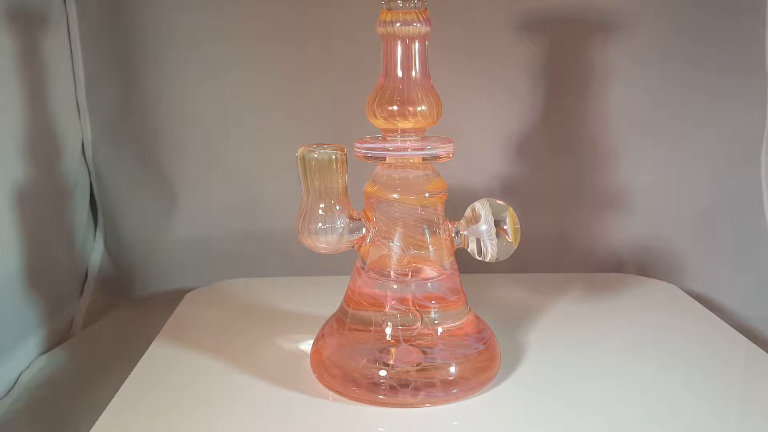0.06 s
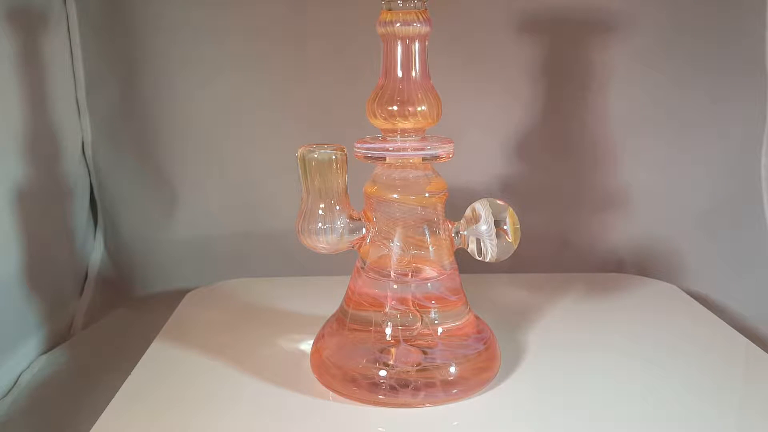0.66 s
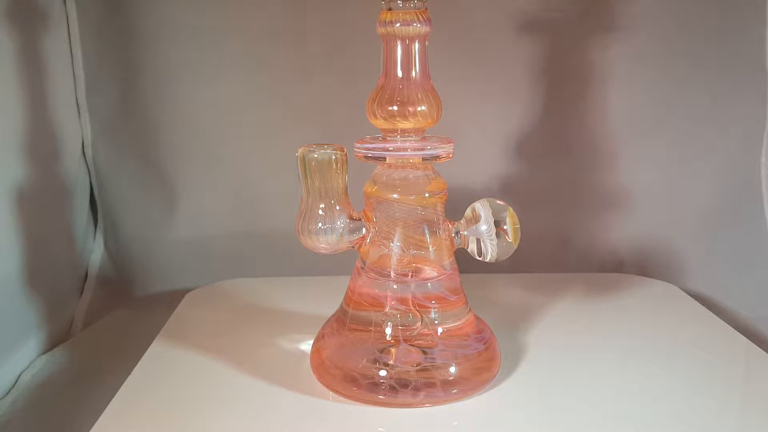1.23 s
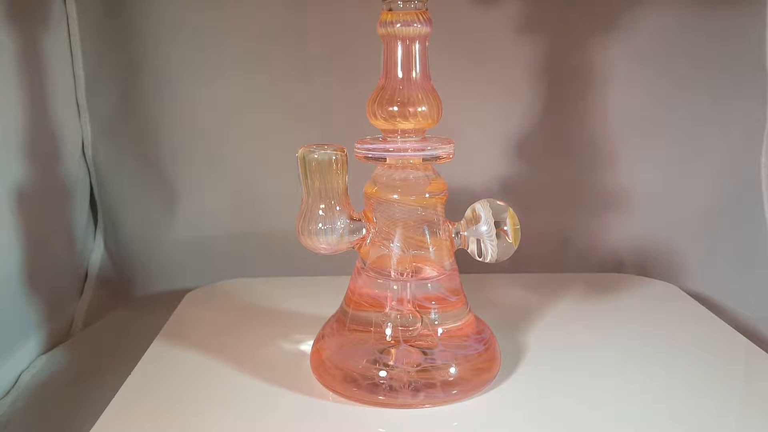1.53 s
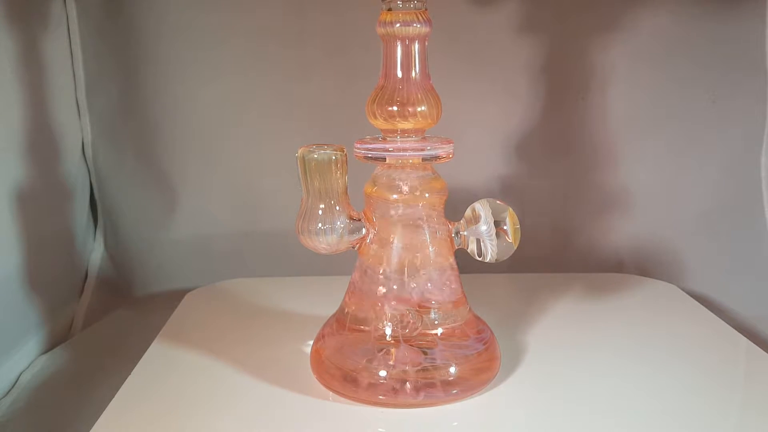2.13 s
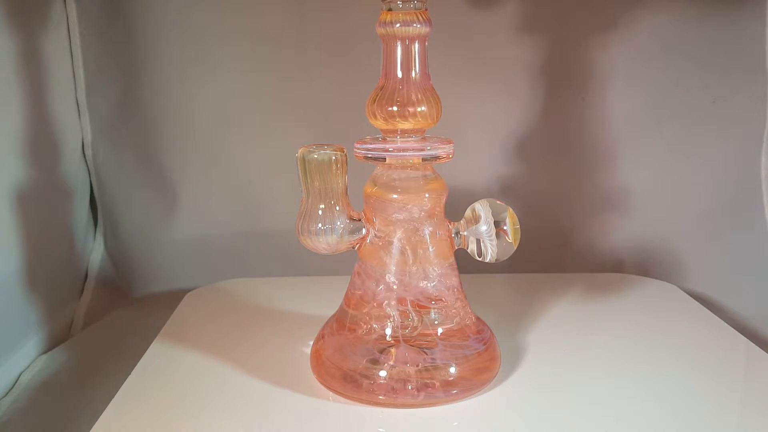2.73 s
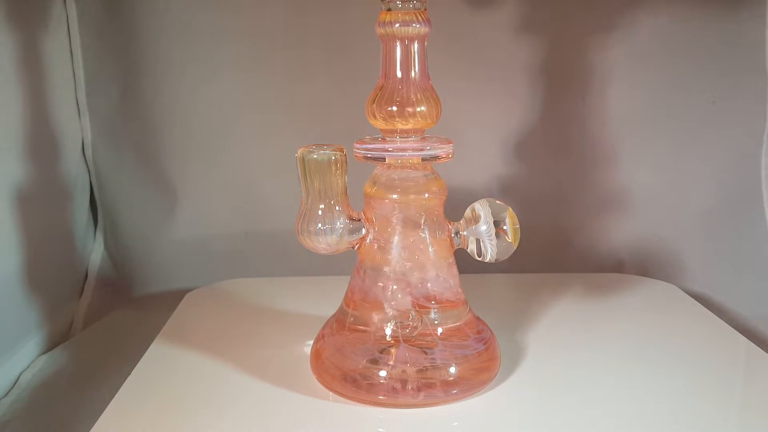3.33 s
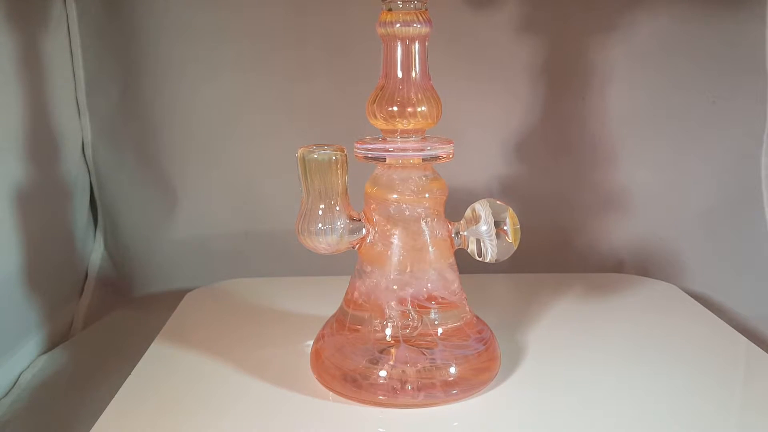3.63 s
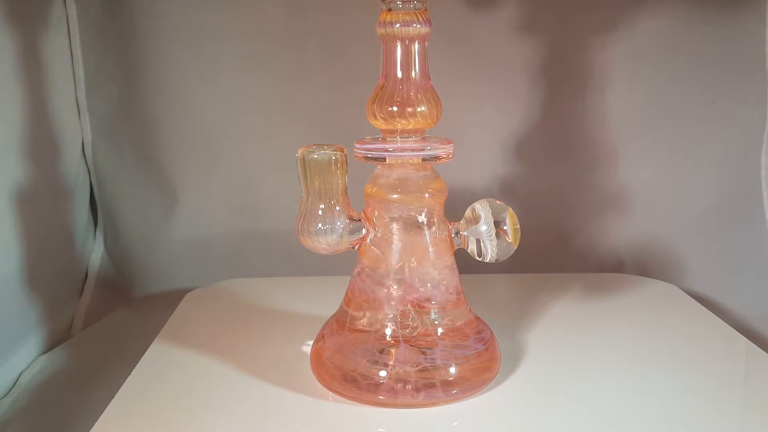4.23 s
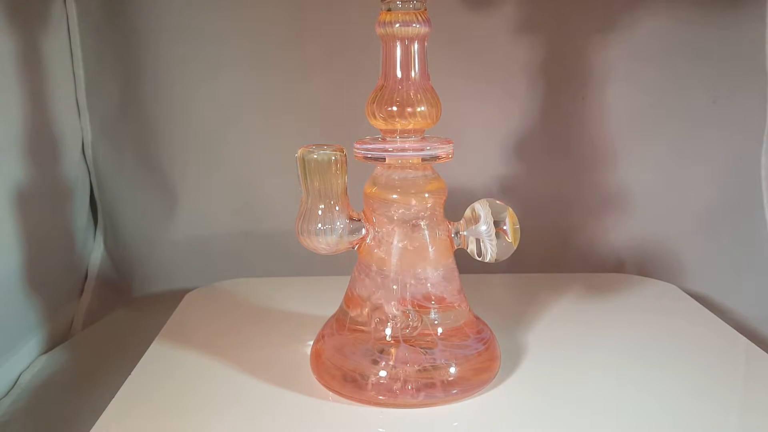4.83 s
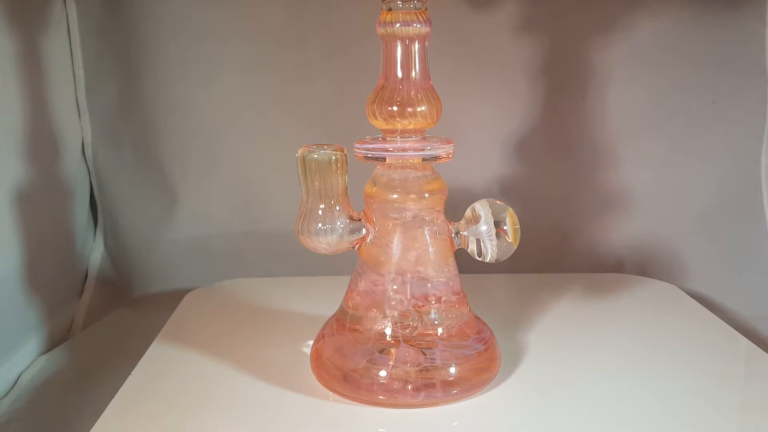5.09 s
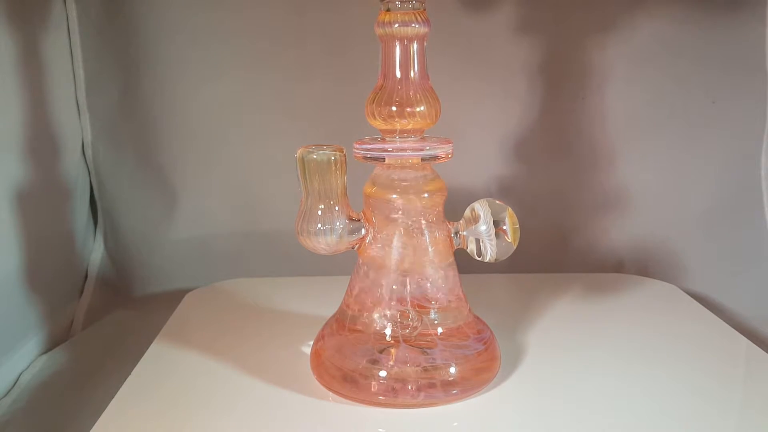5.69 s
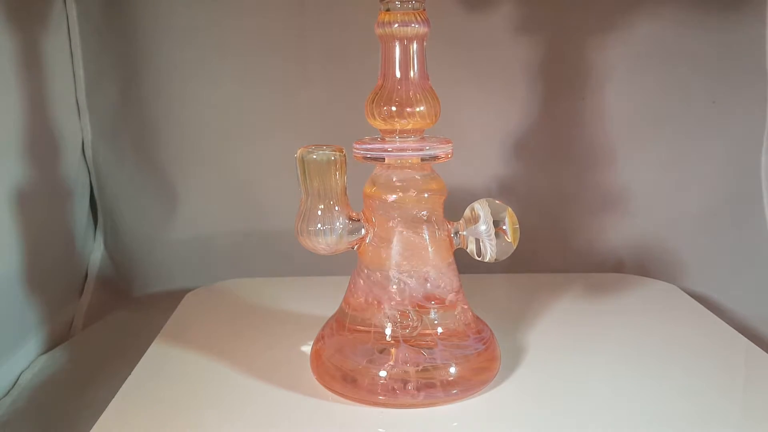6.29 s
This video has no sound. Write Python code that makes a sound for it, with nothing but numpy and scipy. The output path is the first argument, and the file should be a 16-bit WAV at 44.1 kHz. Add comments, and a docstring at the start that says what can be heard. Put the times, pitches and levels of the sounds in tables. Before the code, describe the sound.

Close stereo microphones pick up a glass water pipe in a quiet indoor room. At first there is only a low hum and a faint, fading hiss. Soon the water starts gurgling as air is pulled through it: a rapid, uneven run of hollow plops and low gulps, topped by bright fizzing and tiny splashes against the glass. The bubbling carries on without a pause.

```python
"""A bubbling water pipe

Air is drawn through the water of a glass pipe on a table in a quiet room. Large bubbles tear off
the stem and excite the resonances of the air column; small ones, damped oscillators of higher pitch,
chirp through the wall, and spray ticks on the glass. Two microphones stand close by; the room hums."""
import sys
import numpy as np
from scipy import signal
from scipy.fft import rfft, irfft
from scipy.io import wavfile
from scipy.ndimage import uniform_filter1d, map_coordinates

SR = 44100
rng = np.random.default_rng(int(sys.argv[2]) if len(sys.argv) > 2 else 0)


def bounce(signal):
    """Save signal as a 16-bit WAV file at the path given by the first command-line argument."""
    frames = np.transpose(np.atleast_2d(signal))
    limited = np.clip(frames, -1, 1)
    pcm = np.round(limited * 32767).astype(np.int16)
    wavfile.write(sys.argv[1], SR, pcm)


N = 280035
TIME = np.arange(N) / SR
TAPS = 8192
BINS = np.fft.rfftfreq(TAPS, 1 / SR)
START_S = 1.654  # the first air breaks through
PLOP_HZ, RING_HZ = 827, 1437  # a middling gulp and the upper ring of the air column
THUD_HZ, THUD_SWELL_S, THUD_LEAD_S = 286.5, 0.0018, 0.00084  # the thud comes just before the plop

# strength of the bubbling: (time [s], large-bubble level [dB], small-bubble level [dB])
DRAW = [(1.7, -45.5, -49), (1.8, -38.5, -48), (1.94, -41, -50), (2.6, -37, -48), (3.0, -39, -49),
        (3.29, -39, -47), (3.54, -41.5, -51), (3.8, -37.5, -50), (4.18, -41.5, -53), (4.75, -39, -48.5),
        (5.03, -40, -51), (5.55, -37.5, -49.5), (5.91, -38.5, -48.5), (6.35, -36.5, -47)]
LARGE, SMALL = 1, 2  # columns of DRAW
# loudest large bubbles: (time [s], plop pitch [Hz], pitch fall [ratio], swell [s], plop level [dB],
# ring pitch [Hz], ring level [dB], thud level [dB])
GULPS = [(1.6625, 902, 0, 0.0018, -34.5, 1530, -34.5, -44), (1.6722, 810, 0.1, 0.0012, -38, 1500, -40, -49),
         (1.6925, 840, 0, 0.001, -39.5, 1450, -51, -56),
         (1.7432, 820, 0.48, 0.0018, -39.5, 1470, -32.5, -35.5),
         (1.7771, 908, 0.055, 0.0016, -38, 1500, -39, -36), (1.805, 820, 0, 0.0012, -35, 1510, -29, -37.5),
         (1.8125, 900, 0.28, 0.0013, -33, 1520, -40, -41),
         (1.8186, 755, 0.015, 0.0017, -36.5, 1460, -27.5, -42),
         (1.8773, 845, 0.11, 0.0016, -30.5, 1557, -29, -36), (1.924, 890, 0, 0.00092, -31, 1480, -30, -32),
         (1.972, 860, 0.14, 0.0014, -35, 1480, -67, -40),
         (2.0768, 837, 0.047, 0.0022, -26.5, 1520, -31, -40), (2.13, 935, 0.0, 0.0022, -32, 1430, -36, -63),
         (2.1669, 820, 0.0, 0.0012, -29, 1497, -24, -30),
         (2.1933, 820, 0.0, 0.00046, -33.5, 1350, -43, -28.5),
         (2.26, 876, 0, 0.0013, -41.5, 1470, -41, -40.5), (2.298, 820, 0.03, 0.0013, -35, 1460, -30, -37.5),
         (2.4853, 836, 0.033, 0.0014, -36.5, 1467, -39, -45),
         (2.5435, 875, 0.0045, 0.0032, -37, 1600, -38, -32.5),
         (2.584, 896, 0.0, 0.0017, -24, 1470, -34, -37),
         (2.6582, 885, 0.21, 0.00026, -36, 1490, -55, -34.5),
         (2.7296, 950, 0.075, 0.0028, -35.5, 1490, -33.5, -44.5),
         (2.742, 810, 0.092, 0.0015, -36, 1430, -35, -41),
         (2.8022, 750, 0.37, 0.0019, -32.5, 1430, -33.5, -36.5),
         (2.8151, 820, 0, 0.00081, -31.5, 1473, -49, -49),
         (2.8279, 766, 0.24, 0.0034, -33, 1388, -28.5, -37),
         (2.8946, 935, 0.032, 0.0028, -25, 1474, -36, -33.5),
         (2.9028, 840, 0.037, 0.0012, -35.5, 1500, -56, -46),
         (2.9563, 870, 0.11, 0.0007, -33, 1470, -47, -28),
         (2.9733, 815, 0.0, 0.0015, -37, 1400, -52, -41.5), (3.0015, 836, 0, 0.0018, -35, 1490, -58, -41),
         (3.0263, 895, 0.0, 0.0011, -32.5, 1440, -28, -28),
         (3.066, 793, 0.012, 0.0016, -33.5, 1390, -41, -34),
         (3.0778, 816, 0, 0.0016, -38.5, 1470, -51, -43), (3.1276, 871, 0, 0.001, -46, 1510, -41, -41.5),
         (3.1401, 830, 0.071, 0.0019, -26, 1470, -32.5, -38.5),
         (3.1628, 940, 0.0, 0.0025, -33, 1490, -61, -35.5), (3.171, 790, 0.17, 0.0015, -26, 1420, -51, -65),
         (3.211, 820, 0, 0.0012, -37, 1620, -43, -39), (3.2225, 850, 0.054, 0.0024, -32, 1380, -42, -41),
         (3.2431, 810, 0.078, 0.0019, -34, 1450, -42, -42.5),
         (3.3368, 847, 0, 0.0018, -42, 1392, -39, -43.5), (3.3711, 803, 0.25, 0.0015, -34, 1480, -31, -37),
         (3.4474, 896, 0.023, 0.0026, -36, 1547, -36.5, -53),
         (3.4856, 804, 0.011, 0.002, -30.5, 1453, -31, -37.0), (3.542, 843, 0, 0.0013, -43, 1544, -48, -39),
         (3.568, 825, 0.14, 0.0021, -30.5, 1495, -32.5, -41),
         (3.6262, 820, 0, 0.00076, -39, 1460, -48, -39), (3.6738, 820, 0.1, 0.0015, -37.5, 1420, -42, -42),
         (3.7054, 885, 0.034, 0.0018, -36.5, 1640, -45, -44),
         (3.725, 840, 0.36, 0.0027, -37.5, 1510, -52, -43),
         (3.7448, 830, 0.14, 0.0013, -42, 1470, -35, -38.5),
         (3.7653, 850, 0, 0.00089, -37, 1450, -43, -41.5),
         (3.811, 783, 0.27, 0.0026, -35.5, 1435, -33, -42),
         (3.9045, 840, 0, 0.0022, -38, 1526, -38.5, -39.5),
         (3.9653, 890, 0.27, 0.00089, -27, 1520, -25.5, -31),
         (3.9883, 880, 0.11, 0.0024, -35.5, 1410, -34, -33.5),
         (4.0184, 790, 0, 0.0016, -38.5, 1420, -52, -41.5),
         (4.0728, 900, 0.0, 0.0007, -32.5, 1460, -29, -33.5),
         (4.0854, 920, 0.043, 0.0011, -34.5, 1470, -41, -40),
         (4.1028, 790, 0.27, 0.0014, -40.5, 1429, -46, -34),
         (4.1368, 820, 0.11, 0.001, -32.5, 1410, -37.5, -65),
         (4.1395, 960, 0.1, 0.0043, -39, 1420, -33, -33.5), (4.195, 825, 0, 0.0016, -27, 1390, -44, -46),
         (4.2609, 840, 0.042, 0.0023, -34.5, 1475, -37, -37), (4.2783, 892, 0, 0.0012, -40, 1490, -40, -40),
         (4.3214, 950, 0.084, 0.0032, -34.5, 1486, -36, -68),
         (4.348, 850, 0.0, 0.00081, -34, 1480, -39, -35), (4.3882, 830, 0.046, 0.002, -37, 1530, -42, -39),
         (4.4103, 825, 0, 0.0008, -42, 1480, -50, -38), (4.4641, 926, 0, 0.0016, -39.5, 1527, -41, -35.5),
         (4.562, 860, 0.0, 0.0015, -33.5, 1510, -49, -35), (4.6198, 860, 0.066, 0.002, -37, 1550, -40, -40),
         (4.6445, 856, 0, 0.0012, -39.5, 1524, -52, -49), (4.689, 820, 0.0014, 0.0026, -37, 1493, -29, -37),
         (4.6947, 872, 0.13, 0.0035, -30, 1500, -43.5, -53), (4.7117, 820, 0, 0.0011, -41, 1480, -53, -39),
         (4.7608, 929, 0.093, 0.0039, -36.5, 1444, -36, -39),
         (4.783, 810, 0.091, 0.0013, -35.5, 1501, -39, -39),
         (4.8077, 890, 0, 0.0013, -42, 1520, -44.5, -56), (4.8823, 863, 0.27, 0.0014, -33, 1370, -56, -37),
         (4.8851, 820, 0.21, 0.0015, -35, 1475, -37, -42),
         (4.9689, 847, 0.0, 0.0024, -30.5, 1500, -51, -37.5),
         (5.039, 895, 0.21, 0.0015, -42.5, 1550, -45, -39.5),
         (5.0849, 810, 0.0082, 0.003, -35.5, 1440, -40.5, -40),
         (5.11, 800, 0, 0.0015, -39, 1600, -41, -41.5), (5.2008, 920, 0.051, 0.0012, -50, 1420, -36, -37.5),
         (5.2451, 916, 0.0, 0.0015, -32, 1460, -38, -49), (5.286, 910, 0, 0.0014, -38, 1530, -40, -46),
         (5.3833, 834, 0.067, 0.0012, -47, 1492, -42, -39),
         (5.391, 855, 0.065, 0.0029, -55, 1540, -33, -58), (5.4086, 854, 0, 0.0014, -38.5, 1470, -49, -60),
         (5.467, 856, 0.086, 0.0033, -34.0, 1460, -49, -42),
         (5.5315, 820, 0.34, 0.00062, -36.5, 1430, -37, -33.5),
         (5.5799, 786, 0, 0.00083, -46, 1480, -43, -37.5),
         (5.6167, 864, 0.1, 0.0031, -31, 1490, -31.5, -41), (5.6434, 950, 0.0, 0.0016, -40, 1460, -47, -41),
         (5.7373, 790, 0.18, 0.0014, -38, 1510, -28, -36.5),
         (5.7888, 890, 0.58, 0.0015, -38.5, 1580, -59, -44.5),
         (5.8756, 775, 0, 0.0026, -34.5, 1480, -52, -59), (5.946, 830, 0.31, 0.0013, -35.5, 1386, -34, -42),
         (6.0094, 930, 0, 0.00125, -43, 1470, -40, -35.5),
         (6.0258, 920, 0.18, 0.00085, -32, 1520, -40, -33),
         (6.04, 825, 0.0, 0.0012, -32.5, 1440, -36, -33.5), (6.09, 985, 0.073, 0.0038, -59, 1627, -33, -48),
         (6.11, 820, 0.057, 0.0014, -37, 1450, -32, -64), (6.1192, 950, 0.0, 0.0019, -36, 1490, -38, -36.5),
         (6.1987, 935, 0.067, 0.0024, -37, 1412, -31.5, -43),
         (6.2599, 954, 0.0, 0.0016, -23.5, 1510, -32, -37), (6.2656, 895, 0, 0.00079, -37, 1520, -49, -59),
         (6.2808, 750, 0.39, 0.0014, -36.5, 1570, -65, -33.5),
         (6.3413, 786, 0.12, 0.0024, -35, 1520, -45, -45)]
# deep bubbles: (time [s], relative level [dB], pitch [Hz], swell [s])
GLUGS = [(1.9418, -33, 242, 0.0036), (2.0132, -32.5, 217, 0.003), (2.1063, -39, 256, 0.00079),
         (2.1224, -34, 303, 0.0015), (2.1614, -50, 272, 0.0012), (2.2801, -33, 261, 0.0015),
         (2.3372, -29, 320, 0.0022), (2.471, -36, 300, 0.0019), (2.48, -34, 275, 0.0016),
         (2.6434, -33, 334, 0.0014), (2.734, -28.5, 287, 0.002), (3.6245, -32.5, 266, 0.0027),
         (3.676, -32, 227, 0.0042), (3.8987, -36.5, 227, 0.0035), (4.1886, -33, 302, 0.0015),
         (4.2225, -32, 258, 0.0028), (4.351, -28.5, 263, 0.0017), (4.387, -31.5, 276, 0.0028),
         (4.667, -30.5, 248, 0.0032), (4.739, -32.5, 240, 0.0019), (4.753, -37, 264, 0.0013),
         (4.9381, -41, 274, 0.0024), (5.3284, -33, 293, 0.0018), (5.4479, -30.5, 260, 0.0023),
         (5.4708, -33.5, 320, 0.0032), (5.534, -39, 238, 0.0023), (5.6682, -53, 247, 0.0022),
         (5.6876, -35, 264, 0.0047), (5.7142, -36, 237, 0.0013), (5.7776, -30, 300, 0.0018),
         (5.868, -30.5, 280, 0.0021), (5.941, -39, 320, 0.0023), (5.9924, -32, 242, 0.0021),
         (6.1664, -33.5, 290, 0.0019), (6.24, -33, 255, 0.0024), (6.311, -29, 284, 0.0018)]
# strength of the faint large bubbles by pitch: (frequency [Hz], relative level [dB])
CHURN_SPECTRUM = [(90, 9.5), (140, 8.5), (220, 2), (360, 2), (550, 0.5), (850, -4), (1200, 0.5),
                  (1500, -4.5), (1800, -3)]
# loudest small bubbles: (time [s], relative level [dB], nominal pitch [Hz])
CHIRPS = [(1.875, -45, 5600), (1.9775, -43, 3900), (2.0793, -45.5, 3620), (2.312, -48, 4440),
          (2.527, -40.5, 4480), (2.531, -38, 3050), (2.6405, -42.5, 4920), (2.692, -43, 2950),
          (2.7406, -44, 3700), (2.95, -39.5, 2560), (3.173, -44.5, 5530), (3.1992, -40, 2700),
          (3.269, -43.5, 2460), (3.9386, -39.5, 2830), (4.52, -42, 4400), (4.685, -43.5, 6540),
          (4.727, -39, 2660), (4.833, -40, 2950), (4.952, -44, 5700), (5.5647, -40.5, 2900),
          (6.028, -38, 6330), (6.167, -43.5, 3520), (6.2808, -37.5, 6440)]
# clusters of tiny bubbles: (time [s], relative level [dB], duration [s], middle pitch [Hz])
SPLASHES = [(1.783, -46, 0.0065, 4430), (1.958, -40, 0.0029, 5420), (2.002, -48, 0.0045, 4270),
            (2.0138, -49, 0.025, 5250), (2.128, -41.5, 0.042, 4760), (2.155, -54, 0.008, 5340),
            (2.19, -43, 0.0048, 4390), (2.225, -45, 0.0056, 3790), (2.246, -41.5, 0.0071, 4800),
            (2.37, -57, 0.013, 4330), (2.414, -42, 0.011, 6190), (2.437, -44, 0.0022, 4590),
            (2.452, -49, 0.0061, 4200), (2.501, -56, 0.0093, 5490), (2.553, -38, 0.02, 4530),
            (2.667, -41.5, 0.011, 4600), (2.706, -44, 0.0082, 4900), (2.792, -39.5, 0.0079, 2620),
            (2.807, -44.5, 0.014, 4660), (2.845, -44, 0.0086, 4200), (2.8688, -47, 0.01, 5300),
            (2.8971, -40.5, 0.01, 3860), (2.993, -46, 0.014, 4000), (3.028, -50, 0.0097, 4950),
            (3.062, -40.5, 0.006, 3800), (3.095, -37, 0.019, 3100), (3.121, -42, 0.019, 5430),
            (3.154, -48, 0.0051, 4500), (3.247, -47, 0.0064, 3200), (3.285, -37, 0.009, 3840),
            (3.322, -46, 0.018, 3660), (3.364, -37.5, 0.018, 4640), (3.4266, -45, 0.006, 4440),
            (3.463, -43, 0.008, 5950), (3.4865, -37.5, 0.013, 4500), (3.5332, -50, 0.01, 2470),
            (3.5548, -41, 0.015, 3570), (3.625, -48, 0.011, 4800), (3.681, -48.5, 0.0053, 5200),
            (3.735, -41.0, 0.018, 4720), (3.772, -42, 0.017, 3820), (3.809, -36.5, 0.0051, 3390),
            (3.84, -39.5, 0.013, 3530), (3.8735, -37.5, 0.018, 4000), (3.962, -39.5, 0.007, 6030),
            (3.981, -39, 0.012, 3520), (4.045, -45, 0.009, 4770), (4.074, -43, 0.008, 3320),
            (4.089, -42, 0.008, 5830), (4.102, -45, 0.016, 3800), (4.142, -41, 0.012, 2620),
            (4.1659, -46, 0.0099, 4740), (4.235, -39.5, 0.016, 4400), (4.2737, -39.5, 0.01, 4250),
            (4.33, -46, 0.006, 4530), (4.3523, -45.5, 0.007, 3030), (4.3766, -40, 0.006, 4860),
            (4.3876, -40.0, 0.02, 3470), (4.4353, -43.0, 0.014, 3650), (4.468, -44, 0.006, 4650),
            (4.545, -40.5, 0.012, 4100), (4.592, -44, 0.011, 2900), (4.644, -48, 0.014, 5030),
            (4.732, -43, 0.0067, 5500), (4.773, -38, 0.0084, 3610), (4.927, -46.0, 0.013, 4350),
            (5.002, -38, 0.022, 3740), (5.04, -47, 0.021, 4530), (5.0693, -59, 0.012, 5630),
            (5.162, -39.5, 0.017, 4970), (5.191, -44, 0.021, 4400), (5.232, -44, 0.012, 3700),
            (5.264, -47, 0.022, 4900), (5.3, -46.0, 0.0098, 4100), (5.3209, -43, 0.02, 5000),
            (5.361, -50, 0.013, 4140), (5.385, -39, 0.014, 3770), (5.405, -51, 0.02, 5100),
            (5.462, -47.0, 0.0057, 5930), (5.468, -46.5, 0.0083, 6400), (5.502, -50, 0.011, 4000),
            (5.5974, -39, 0.017, 3450), (5.614, -42, 0.017, 4600), (5.65, -50, 0.006, 4300),
            (5.67, -37.5, 0.009, 4300), (5.74, -54, 0.016, 4770), (5.763, -54, 0.0077, 4990),
            (5.778, -56, 0.014, 5660), (5.804, -40.0, 0.016, 4360), (5.835, -48, 0.012, 3000),
            (5.9, -42, 0.0093, 3600), (5.92, -46.5, 0.015, 4000), (5.952, -45, 0.015, 4740),
            (6.066, -37, 0.022, 3200), (6.109, -40.0, 0.016, 6130), (6.136, -40.5, 0.014, 3330),
            (6.202, -39, 0.019, 4440), (6.239, -46, 0.0057, 2640), (6.258, -40, 0.01, 5670),
            (6.32, -42.0, 0.007, 4600)]
# tearing bubble skins: (time [s], relative level [dB])
SPITS = [(1.8481, -41), (2.0212, -45), (2.321, -60), (2.4772, -48), (2.5885, -47), (2.657, -42),
         (3.173, -48), (3.7504, -58), (3.963, -44), (4.6912, -56), (4.732, -46), (5.386, -44),
         (5.5022, -45), (5.6191, -46), (5.7865, -44), (6.2566, -46)]
# spectrum of a spit: (frequency [Hz], gain [dB])
SPIT_SPECTRUM = [(1000, -19), (4000, -2.5), (8800, 10), (11000, -5.5), (13000, -1), (15000, -10)]
# large drops striking the glass: (time [s], relative level [dB])
TINKS = [(2.17, -42.5), (2.658, -45), (3.029, -46.5), (4.1396, -42.5), (4.552, -48), (4.692, -41),
         (5.464, -37), (5.604, -39.5)]
# resonances of the air above the water: (frequency [Hz], bandwidth [Hz], gain [dB])
AIR_MODES = [(115.8, 42, -6), (215.2, 27.4, 4), (285, 110, -3.5), (373, 50, -10.5), (509.5, 50, -7),
             (785, 200, -0.5), (948, 58, 2), (1209, 83, -7), (1291, 60, -0.5), (1434, 142, 6.5),
             (1565, 100, 2.5), (1646, 52, -2)]
# resonances of the vessel: (frequency [Hz], bandwidth [Hz], gain [dB])
GLASS_MODES = [(2530, 190, -2), (2970, 170, 2), (3410, 130, -1.5), (3900, 84, 4.5), (4297, 140, 8),
               (4756, 256, 9.5), (5520, 420, 5), (6463, 480, 4.5), (6880, 580, -0.5), (8420, 490, -3),
               (8747, 136, 7.5), (9300, 170, -3), (15500, 640, -8)]
# broadband transmission through the wall: (frequency [Hz], gain [dB])
GLASS_LEAK = [(300, -26.0), (2000, 6.0), (3200, 1.0), (6500, -4.5), (7600, -16.5), (10500, -22.5),
              (13800, -20), (16000, -42)]
# balance of the microphones: (frequency [Hz], left minus right level [dB])
MIC_BALANCE = [(60, -3), (210, -1), (380, -3.5), (465, -18), (510, 1.5), (560, 9), (660, 17), (720, -3),
               (800, 2.5), (1050, -4), (1200, -23.5), (1350, 6.5), (1440, -13), (1540, -10.5), (1710, -3),
               (1900, 7), (2300, -2.5), (3000, 3.5), (4700, 1), (5550, -9), (6100, 5.5), (8800, -4),
               (15000, -0.5)]
# phase between the microphones at bearing 1: (frequency [Hz], lead of the left [rad])
MIC_LEAD = [(330, 0), (540, .9), (700, 0), (1050, 0), (1170, 3), (1340, 3), (1460, 1.4), (1700, 1.6),
            (2800, 2.7), (3400, 3.8), (3950, 8.2), (4250, 6.4), (4650, 8.4), (6000, 7.8), (6600, 9.8),
            (8800, 11.2), (16000, 22)]
# reverberation of the room: (frequency [Hz], time to decay by 60 dB [s])
ROOM_T60 = [(150, 1), (600, 0.19), (1500, 0.51), (5000, 0.097), (15000, 0.33)]
# room noise: (frequency [Hz], relative spectral density [dB])
NOISE_SPECTRUM = [(20, -52), (42, -9), (72, -12), (112, -1.5), (165, -10.5), (235, -10), (260, -6.5),
                  (297, -2), (325, -24), (425, -11.5), (460, -22), (840, -31), (2700, -36), (3300, -28),
                  (4200, -41.5), (5200, -43.5), (6300, -44.5), (7150, -37), (8300, -48), (10000, -47),
                  (16000, -43)]
# likeness of the room noise at the two microphones: (frequency [Hz], correlation [0-1])
NOISE_CORRELATION = [(100, .99), (400, .93), (1000, .55), (3000, .3), (12000, .1)]
# partials of the room hum: (frequency [Hz], relative level [dB])
HUM = [(59, -66), (104, -73.5), (191, -57.5), (284, -78.5), (350, -76.5), (414, -70)]
# spectrum of the opening hiss: (frequency [Hz], relative level [dB])
HISS_SPECTRUM = [(200, 3), (1000, -8), (3000, -10), (5500, -16.5), (8500, -13.5), (11000, -20),
                 (16000, -15)]


def gulps():
    """Bubble detachment: the loudest large bubbles tear off the stem one by one."""
    out = np.zeros(N)
    for (s, *row), thud_detune in zip(GULPS, rng.standard_normal(len(GULPS))):
        add(out, s - THUD_LEAD_S, gulp(row, thud_detune))
    return out


def gulp(row, thud_detune):
    """Impulsive excitation: a large bubble shoves the water, plops and rings the air column."""
    hz, fall, swell_s, plop_db, ring_hz, ring_db, thud_db = row
    out = np.zeros(TAPS // 2)
    add(out, 0, at_level(plop(THUD_HZ * np.exp(0.11 * thud_detune), THUD_SWELL_S, fall=0), thud_db))
    add(out, THUD_LEAD_S, at_level(plop(hz, swell_s, fall), plop_db))
    add(out, THUD_LEAD_S, at_level(plop(ring_hz, swell_s, fall=0.028), ring_db))
    return out


def plop(hz, swell_s, fall):
    """Cavity resonance: a round note swells and dies, sinking in pitch as the cavity grows."""
    age = np.arange(TAPS // 4) / SR / max(swell_s, 3e-4)
    pitch = hz * np.exp(-fall * np.tanh((age - 2) / 3))
    return age ** 1.5 * np.exp(-age) * np.sin(2 * np.pi * np.cumsum(pitch) / SR)


def bubble(hz, t60, glide=0.005, onset_s=0.0012):
    """Damped oscillation: a decaying sine glides as the bubble changes shape near the surface."""
    t = np.arange(TAPS // 4) / SR
    age = t / max(t60, 1e-3)
    phase = 2 * np.pi * hz * t * (1 + glide * np.minimum(age, 2))
    onset = 1 - np.exp(-(t / onset_s) ** 2)
    return np.sin(phase) * np.exp(-np.log(1000) * age) * onset


def knocks(db=-9.5, longest_s=0.0015, delay_s=0.00092):
    """Direct transmission: the briefest large bubbles collapse hard and knock through the wall."""
    out = np.zeros(N)
    for s, hz, _, swell_s, level_db, *_ in GULPS:
        if swell_s < longest_s:
            add(out, s + delay_s, at_level(bubble(hz * 1.2, t60=0.0032, onset_s=0.000066), level_db))
    return amp(db) * out


def lesser_gulps(db=-6.5, per_s=36, jitter=0.35, fall=0.11, swell_s=0.00096, count=190):
    """Quasi-periodic detachment: weaker gulps leave the stem in a loose rhythm, scaled by the flow."""
    out = np.zeros(N)
    for k, (late, plop_detune, ring_detune, thud_detune, *_) in enumerate(rng.normal(size=(count, 7))):
        hz = PLOP_HZ * np.exp(0.094 * plop_detune)
        ring_hz = RING_HZ * np.exp(0.047 * ring_detune)
        s = START_S + (k + 1 + jitter * late) / per_s
        add(out, s, gulp((hz, fall, swell_s, db, ring_hz, db, db), thud_detune))
    return flow(LARGE, rise_s=0.18) * out


def glugs(db=-1.0, crowd_db=-14.0, per_s=60, count=8):
    """Low-frequency resonance: single deep bubbles glug over a crowd of longer-ringing ones."""
    out, crowd = np.zeros(N), np.zeros(N)
    for s, level_db, hz, swell_s in GLUGS:
        add(out, s, at_level(plop(hz, swell_s, fall=0), level_db + db))
    for hz in np.linspace(195, 380, count):
        clicks = births(per_s / count, spread_db=-0.5, limit=1.2)
        crowd += excite(clicks, bubble(hz, t60=0.02, onset_s=0.0034))
    return out + amp(crowd_db) * flow(LARGE, rise_s=0.067) * evened(crowd)


def breakthrough(db=-46.0, fade_db_per_s=140, gap_s=0.014, fall=0.1, swell_s=0.0032, count=4):
    """Pitch falls with size: the first air escapes in a run of ever larger, lower, weaker plops."""
    out = np.zeros(N)
    for age, thud_detune in zip(np.arange(count) * gap_s, rng.standard_normal(count)):
        smallness = np.exp(-age / 0.014)
        hz, ring_hz = 720 + 260 * smallness, 1420 + 210 * smallness
        plop_db = db - fade_db_per_s * age
        row = (hz, fall, swell_s, plop_db, ring_hz, plop_db + 4.5, db - 1)
        add(out, START_S - THUD_LEAD_S + age, gulp(row, thud_detune))
    return out


def churn(pipe, db=-1.5, per_s=380, count=48):
    """Source and filter: surges of faint large bubbles sound through the modes of the air column."""
    out = np.zeros(N)
    for hz in np.linspace(90, 1750, count):
        grain = bubble(hz, t60=0.0074 * rng.uniform(0.25, 1.6), onset_s=0.0022)
        clicks = births(per_s / count, spread_db=0.5, limit=1.7)
        out += excite(clicks, at_level(grain, read(CHURN_SPECTRUM, hz)))
    ringing = excite(out * surge(depth_db=1.7, length_s=0.02), pipe)
    return amp(db) * flow(LARGE, rise_s=0.068) * evened(slosh(ringing, depth=0.0306, length_s=0.0358))


def chirps(glass, db=2.0, cycles=65, splash_db=-19.0, splash_s=0.0017):
    """Constant-Q damping: the smaller a bubble, the shorter it rings. Each also splashes the glass."""
    out = np.zeros(N)
    age = np.arange(TAPS // 8) / SR / splash_s
    for (s, level_db, hz), drops in zip(CHIRPS, rng.standard_normal((len(CHIRPS), len(age)))):
        note = bubble(hz * 1.04, cycles / hz, glide=-0.21, onset_s=0.00047)
        splash = signal.fftconvolve(drops * age * np.exp(-age), glass)
        add(out, s, at_level(note, level_db + db))
        add(out, s, at_level(splash, level_db + splash_db))
    return out


def stray_chirps(glass, db=-6.5, per_s=170, spread_db=3.0, low_hz=2300, high_hz=6600, cycles=56):
    """A Poisson process: fainter small bubbles burst at independent moments and fall in pitch."""
    out, s = np.zeros(N), START_S
    for wait, height, strength in rng.random((950, 3)):
        s -= np.log(1 - wait) / per_s
        hz = low_hz * (high_hz / low_hz) ** height
        note = bubble(hz, cycles / hz, glide=-0.191, onset_s=0.00084)
        add(out, s, at_level(note, spread_db * strength))
    return amp(db) * flow(SMALL, rise_s=0.091) * evened(excite(out, glass))


def fizz(glass, db=-3.5, per_s=1400, cycles=42, count=40):
    """Incoherent superposition: many small bubbles, each ringing tens of cycles, merge into a fizz."""
    out = np.zeros(N)
    for hz in np.linspace(2100, 7000, count) * rng.uniform(1.0, 1.03, count):
        t60 = cycles / hz * rng.uniform(0.4, 2)
        grain = bubble(hz, t60, glide=rng.uniform(-0.22, 0.02), onset_s=0.0005)
        out += excite(births(per_s / count, spread_db=5.0, limit=5.26), at_level(grain, 0))
    ringing = excite(out * surge(depth_db=4.8, length_s=0.012), glass)
    return amp(db) * flow(SMALL, rise_s=0.34) * evened(slosh(ringing, depth=0.01205, length_s=0.0523))


def splashes(glass, db=-2.0, drops_db=-4.0, spread_db=4.0, cycles=42, count=12):
    """Forced vibration: a cluster of tiny bubbles and a puff of droplets drive the glass wall."""
    out, t = np.zeros(N), np.arange(TAPS // 4) / SR
    for s, level_db, length_s, hz in SPLASHES:
        cluster = np.zeros(len(t))
        for when, (detune, strength) in zip(rng.random(count), rng.standard_normal((count, 2))):
            pitch = min(hz * np.exp(0.181 * detune), SR / 5)
            note = bubble(pitch, cycles / pitch, glide=-0.18, onset_s=0.000094)
            add(cluster, when * length_s, amp(spread_db * strength) * note)
        age = t / max(length_s, 0.003)
        drops = rng.standard_normal(len(t)) * np.sqrt(age) * np.exp(-2 * age ** 2)
        drive = at_level(cluster, 0) + at_level(drops, drops_db)
        add(out, s, at_level(signal.fftconvolve(drive, glass), level_db + db))
    return out


def spray(glass, db=-3.5, burst_db=-12.0, burst_t60=0.0074, ring_db=-14.0):
    """Broadband excitation: mist and bursts from loud gulps wet the glass; droplets ring a high mode."""
    t, bursts = np.arange(TAPS // 8) / SR, np.zeros(N)
    envelope = np.minimum(t / 0.00079, 1) * np.exp(-np.log(1000) * t / burst_t60)
    for (s, _, _, swell_s, level_db, *_), drops in zip(GULPS, rng.standard_normal((len(GULPS), len(t)))):
        violence = np.sqrt(0.00013 / max(swell_s, 0.0005))  # a quick collapse throws more spray
        add(bursts, s, violence * at_level(drops * envelope, level_db + burst_db))
    mist = evened(excite(rng.standard_normal(N) * surge(depth_db=3.0, length_s=0.0029), glass))
    droplets = births(per_s=440, spread_db=6.1, limit=5.25)
    ring = evened(excite(droplets, bubble(hz=8770, t60=0.03, glide=0, onset_s=0.0024)))
    return flow(SMALL, rise_s=0.11) * (amp(db) * mist + amp(ring_db) * ring) + excite(bursts, glass)


def spits(db=-8.0, swell_s=0.0017, faint_db=-14.5):
    """Film rupture: a tearing bubble skin gives a brief, bright puff; faint ones come at random."""
    age, out = np.arange(TAPS // 8) / SR / swell_s, np.zeros(N)
    puff = age * np.exp(-age)
    for (s, level_db), noise in zip(SPITS, rng.standard_normal((len(SPITS), len(age)))):
        add(out, s, at_level(noise * puff, level_db))
    tears = births(per_s=14, spread_db=3.5, limit=2.1)
    faint = excite(tears, at_level(puff, faint_db)) * rng.standard_normal(N)
    return tinted(amp(db) * out + faint * flow(SMALL, rise_s=0.33), SPIT_SPECTRUM)


def tinks(db=-6.0, hz=8780, t60=0.025):
    """Free vibration: a high mode of the glass rings on after a large drop strikes it."""
    out = np.zeros(N)
    for (s, level_db), detune in zip(TINKS, rng.standard_normal(len(TINKS))):
        ring = bubble(hz * (1 + 0.002 * detune), t60, glide=-0.0023, onset_s=0.00043)
        add(out, s, at_level(ring, level_db))
    return amp(db) * out


def flow(column, rise_s):
    """Amplitude envelope: the bubbling follows the draw, swelling in from the first bubble."""
    rows = np.array(DRAW)
    return amp(np.interp(TIME, rows[:, 0], rows[:, column])) * np.clip((TIME - START_S) / rise_s, 0, 1)


def births(per_s, spread_db, limit):
    """Shot noise: random impulses of uneven size occur while the air flows."""
    chance, size = rng.random(N), rng.exponential(1, N)
    return (chance < per_s / SR) * (TIME > START_S) * amp(spread_db * np.minimum(size, limit))


def surge(depth_db, length_s):
    """Amplitude modulation: the heaving water gives a random swell of level, bounded above."""
    return amp(depth_db * np.minimum(wander(length_s), 2))


def slosh(x, depth, length_s):
    """Frequency modulation: the moving surface bends all resonances by the rms fraction depth."""
    shift = wander(length_s)
    shift *= depth / np.std(np.diff(shift))
    return map_coordinates(x, [np.arange(N) + shift], order=3)


def resonator(modes, leak_db):
    """Minimum-phase impulse response of a set of resonances over a broadband leak."""
    peaks = sum(amp(db) ** 2 / (1 + ((BINS - hz) / width * 2.12) ** 2) ** 2 for hz, width, db in modes)
    cepstrum = irfft(np.log(amp(leak_db) ** 2 + peaks) / 2)
    cepstrum[1:TAPS // 2] *= 2  # folding the cepstrum makes the response causal
    cepstrum[TAPS // 2 + 1:] = 0
    return irfft(np.exp(rfft(cepstrum)))[:TAPS // 4]


def microphones(x, bearing=1):
    """Spaced reception: level and phase differ between two microphones; bearing scales the delay."""
    hz = np.fft.rfftfreq(N + TAPS, 1 / SR)
    ratio, lead = amp(read(MIC_BALANCE, hz)), bearing * read(MIC_LEAD, hz)
    pair = np.array([ratio * np.exp(0.5j * lead), np.exp(-0.5j * lead)]) * np.sqrt(2 / (1 + ratio ** 2))
    return irfft(rfft(x, N + TAPS) * pair, N + TAPS)[:, :N]


def room(x, low_db=-12.5, high_db=-5.5, echoes_per_s=3000, gap_s=0.0017, mono_hz=1400):
    """Reverberation: echoes from table and walls decay exponentially, coherent in the bass."""
    delay = TIME[:2 * TAPS]
    shape = (2, len(delay))
    echoes = rng.standard_normal(shape) * (rng.random(shape) < echoes_per_s / SR) * (delay > gap_s)
    echoes *= 1 + 5.4 * np.exp(-delay / 0.0031)  # the nearest surfaces answer loudest
    hz, t, bands = signal.stft(echoes, SR, nperseg=256)
    same = 1 / (1 + (hz[:, None] / mono_hz) ** 4)
    bands[1] = same * bands[0] + np.sqrt(1 - same ** 2) * bands[1]
    decay = np.exp(-np.log(1000) * t / read(ROOM_T60, hz)[:, None])
    tail = signal.istft(bands * decay, SR, nperseg=256)[1]
    wet = amp(read([(1200, low_db), (5000, high_db)], np.fft.rfftfreq(tail.shape[1], 1 / SR)))
    tail = irfft(rfft(tail / np.linalg.norm(tail[0])) * wet)
    return signal.fftconvolve(x[None], tail, axes=1)[:, :N]


def background(noise_db=-56.5, hum_db=-2.5, waver_hz=3.52):
    """Ambient noise: a low, partly coherent rush, and a hum of even strength that wavers in pitch."""
    hz = np.fft.rfftfreq(N, 1 / SR)
    left, independent = rng.standard_normal((2, len(hz))) + 1j * rng.standard_normal((2, len(hz)))
    same = read(NOISE_CORRELATION, hz)
    right = same * left + np.sqrt(1 - same ** 2) * independent
    noise = irfft(np.array([left, right]) * amp(read(NOISE_SPECTRUM, hz)), N)
    hum = np.zeros(N)
    for partial_hz, db in HUM:
        pitch = partial_hz + waver_hz * wander(length_s=0.0413)
        hum += amp(db) * evened(np.sin(2 * np.pi * np.cumsum(pitch) / SR))
    return amp(noise_db) * evened(noise) + amp(hum_db) * hum


def hiss(db=-60.0, fade_s=0.64):
    """Exponential decay: a faint, wide hiss dies away from the start."""
    pair = np.array([evened(tinted(noise, HISS_SPECTRUM)) for noise in rng.standard_normal((2, N))])
    return amp(db) * np.exp(-TIME / fade_s) * pair


def amp(db):
    """Amplitude ratio of a level in decibels."""
    return 10 ** (np.asarray(db) / 20)


def evened(x):
    """Normalisation to unit rms."""
    return x / np.sqrt(np.mean(x ** 2) + 1e-20)


def at_level(sound, db):
    """Equivalent level: a short sound is given the energy of 10 ms at db."""
    return amp(db) * sound * np.sqrt(SR / 100 / np.sum(sound ** 2))


def read(points, hz):
    """Interpolation of a table on a log-frequency axis."""
    f, value = np.transpose(points)
    return np.interp(np.log(hz + 1), np.log(f + 1), value)


def add(mix, s, sound):
    """Superposition of a sound on the mix at s seconds."""
    part = mix[max(round(s * SR), 0):][:len(sound)]
    part += sound[:len(part)]


def excite(drive, response):
    """Convolution of a drive with an impulse response."""
    return signal.oaconvolve(drive, response)[:N]


def tinted(x, spectrum):
    """Zero-phase filtering by a table of gains."""
    return irfft(rfft(x) * amp(read(spectrum, np.fft.rfftfreq(N, 1 / SR))), N)


def wander(length_s):
    """Low-pass noise of unit rms, smoothed over length_s."""
    size = max(int(length_s * SR), 2)
    return evened(uniform_filter1d(uniform_filter1d(rng.standard_normal(N), size), size))


def scene():
    """Direct and reverberant sound of the pipe, fizzing at its near and far walls, over room noise."""
    pipe = resonator(AIR_MODES, leak_db=-44.0)
    glass = resonator(GLASS_MODES, leak_db=read(GLASS_LEAK, BINS))
    large = gulps() + knocks() + lesser_gulps() + glugs() + breakthrough() + churn(pipe)
    small = chirps(glass) + stray_chirps(glass) + fizz(glass)
    water = large + small + spray(glass) + splashes(glass) + spits() + tinks()
    far_wall = fizz(glass)
    direct = microphones(water) + microphones(far_wall, bearing=0.9)
    return direct + room(water + far_wall) + background() + hiss()


def record(dry):
    """Band limiting: a linear-phase low-pass filter removes the highest treble."""
    lowpass = signal.firwin(511, cutoff=15900, window=("kaiser", 9), fs=SR)
    return signal.oaconvolve(dry, lowpass[None], "same")


dry = scene()
out = record(dry)
bounce(out)
```